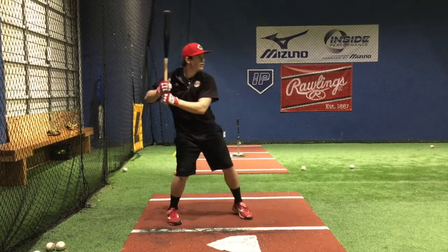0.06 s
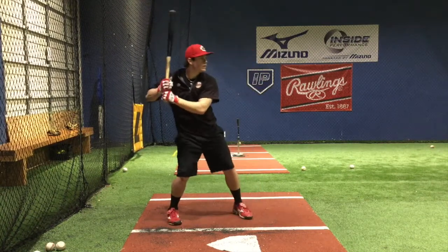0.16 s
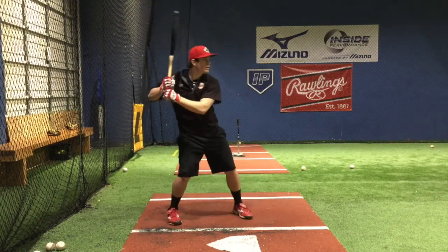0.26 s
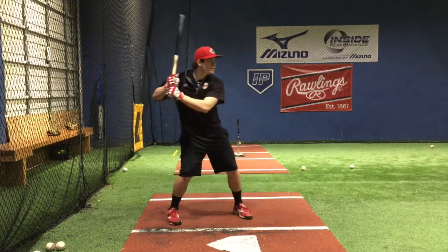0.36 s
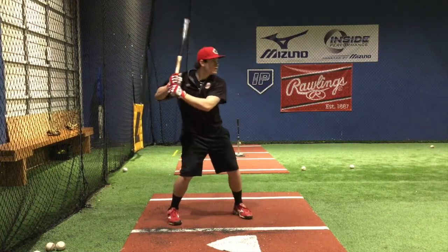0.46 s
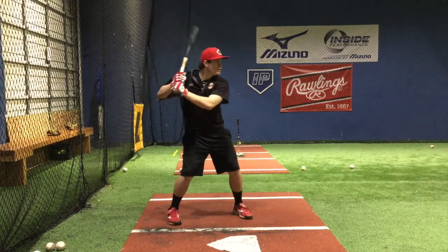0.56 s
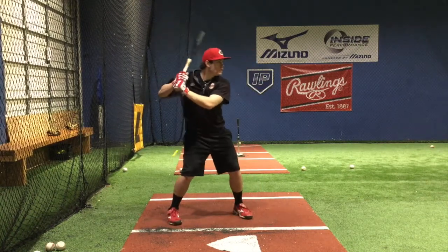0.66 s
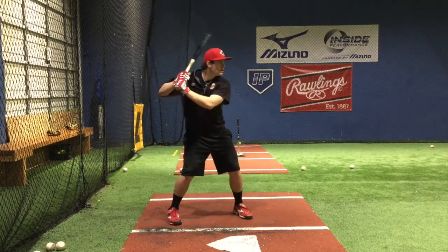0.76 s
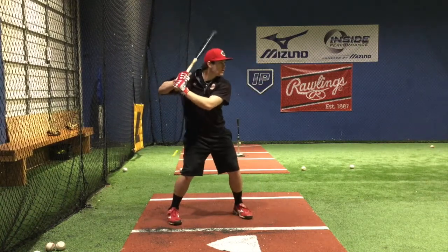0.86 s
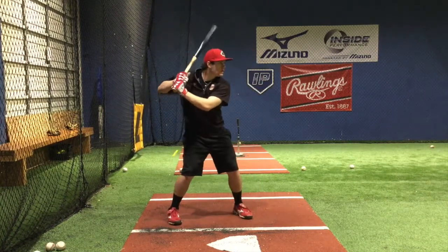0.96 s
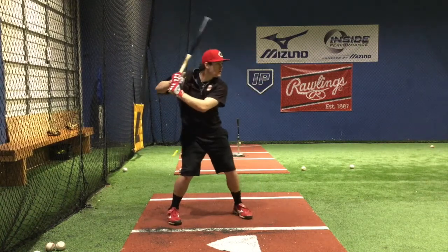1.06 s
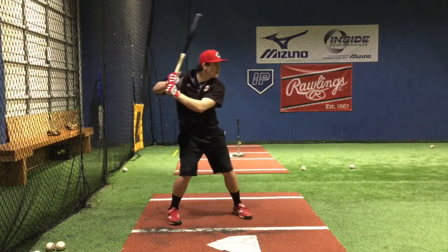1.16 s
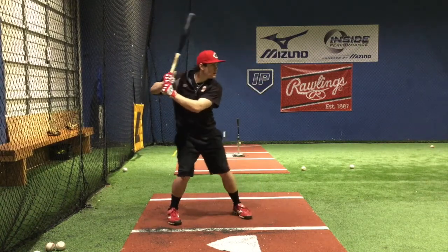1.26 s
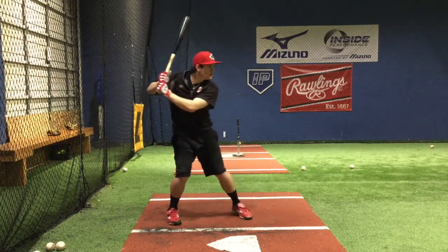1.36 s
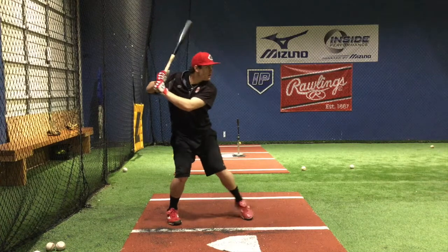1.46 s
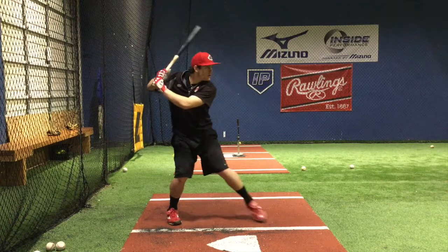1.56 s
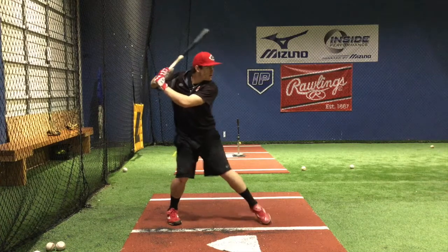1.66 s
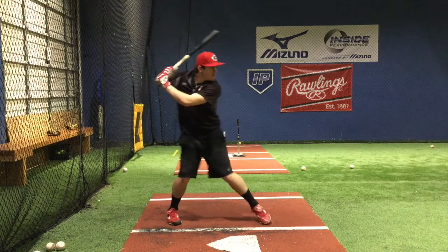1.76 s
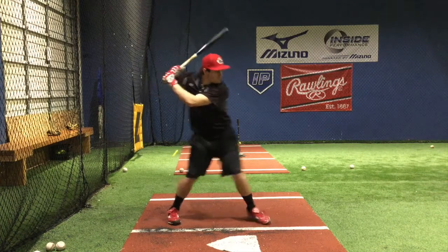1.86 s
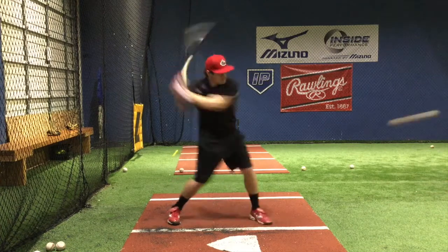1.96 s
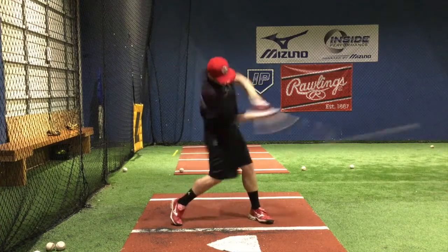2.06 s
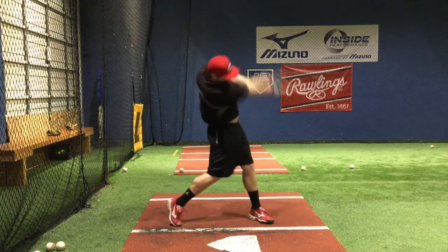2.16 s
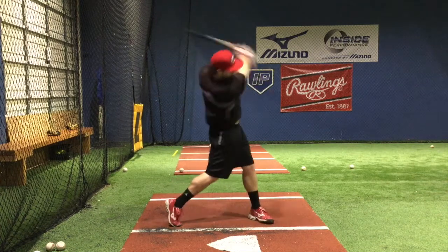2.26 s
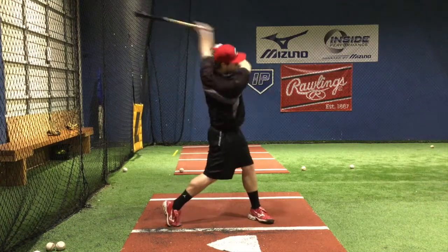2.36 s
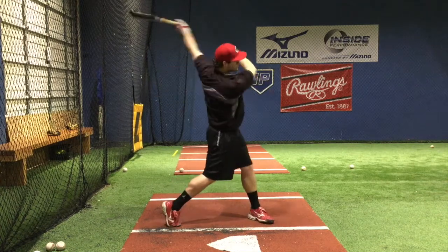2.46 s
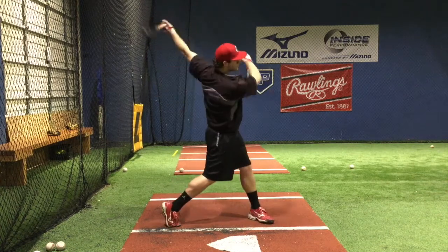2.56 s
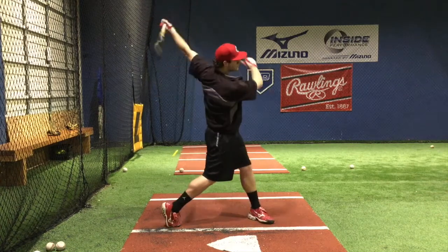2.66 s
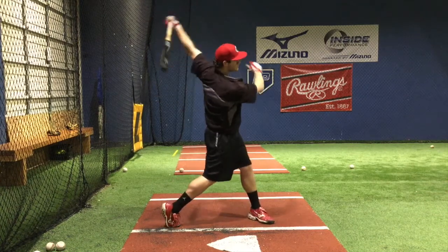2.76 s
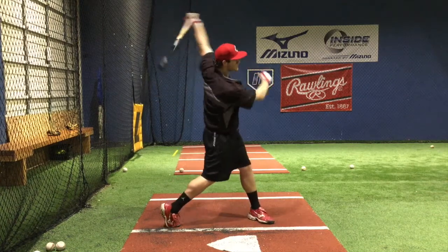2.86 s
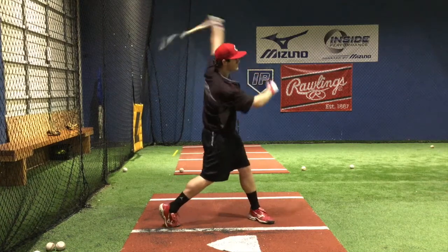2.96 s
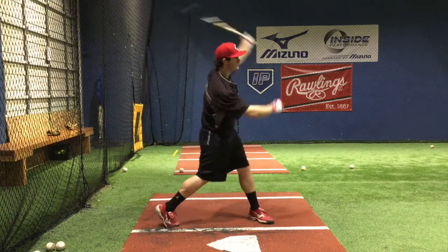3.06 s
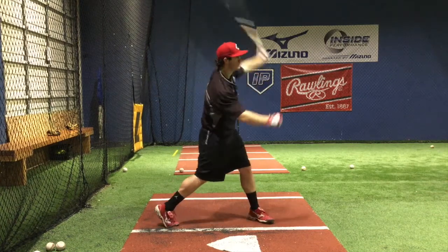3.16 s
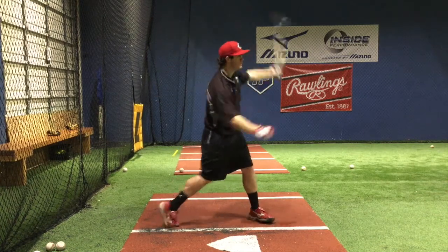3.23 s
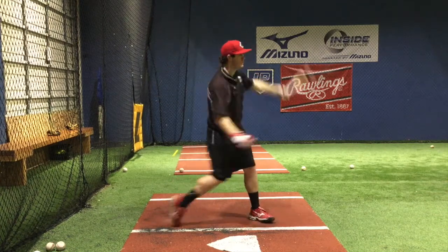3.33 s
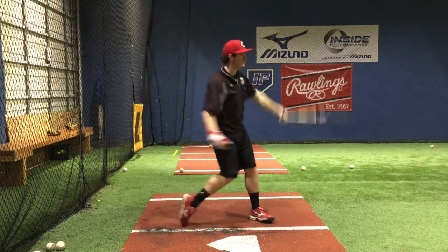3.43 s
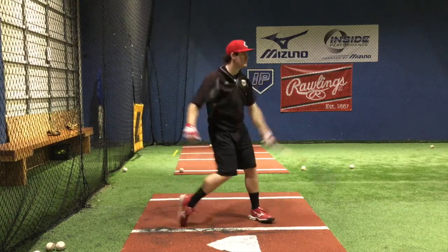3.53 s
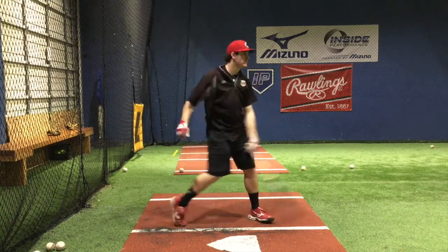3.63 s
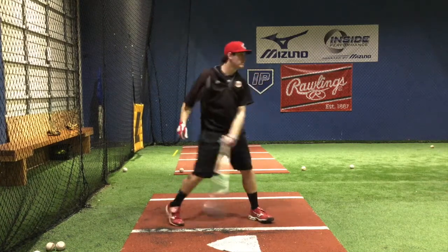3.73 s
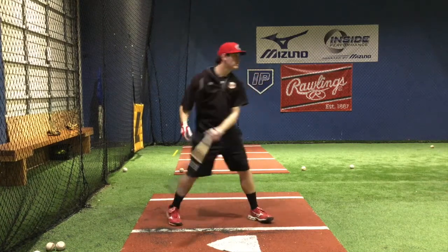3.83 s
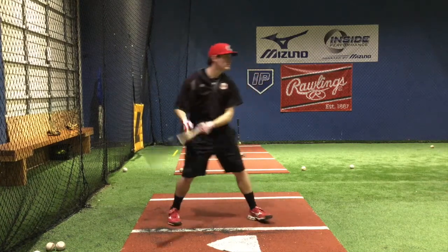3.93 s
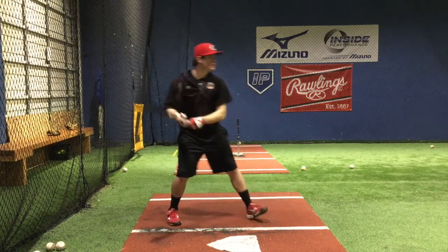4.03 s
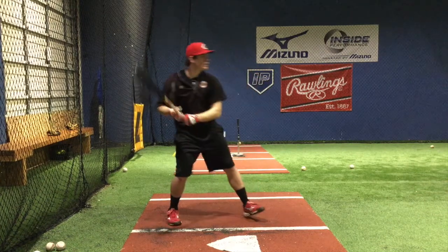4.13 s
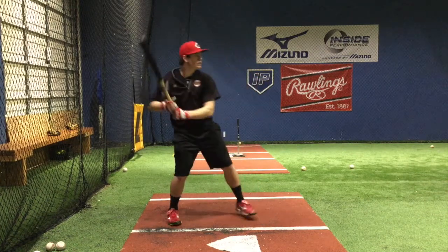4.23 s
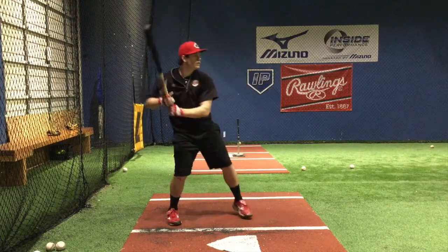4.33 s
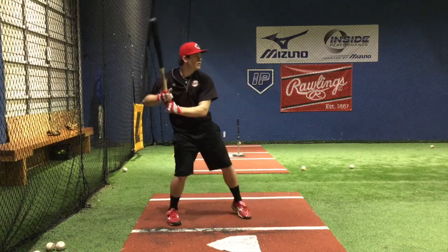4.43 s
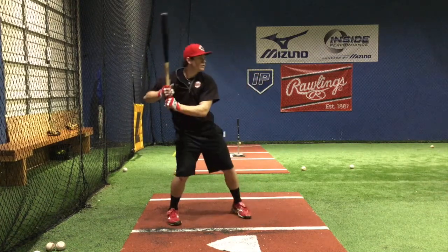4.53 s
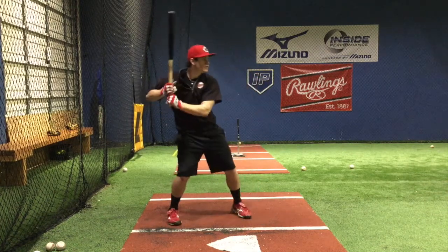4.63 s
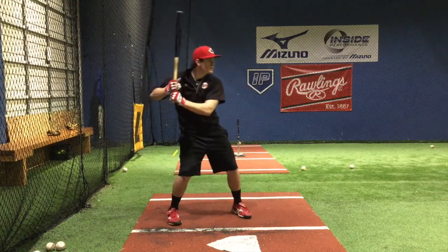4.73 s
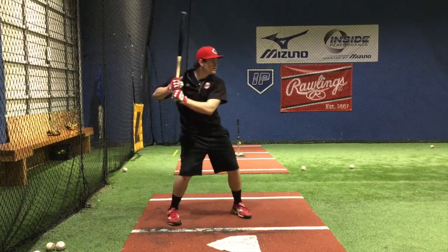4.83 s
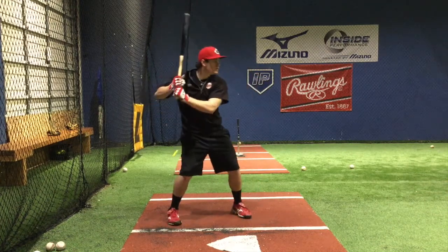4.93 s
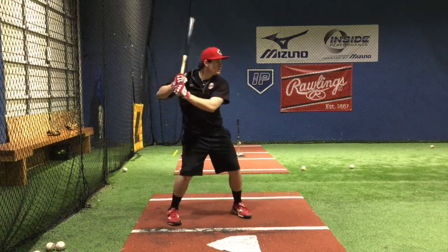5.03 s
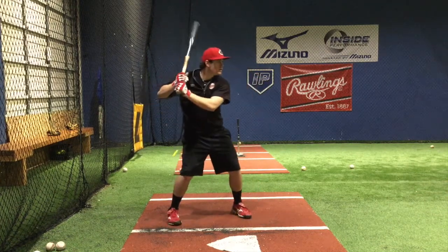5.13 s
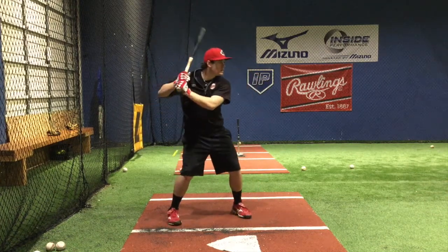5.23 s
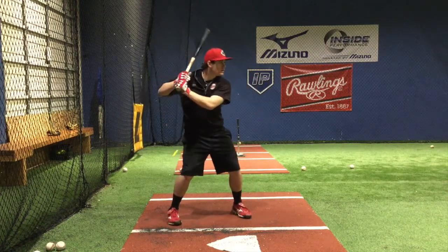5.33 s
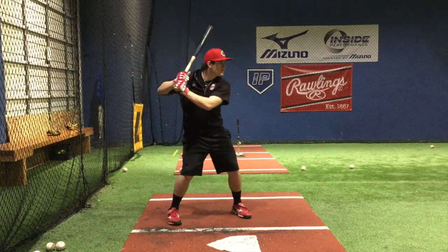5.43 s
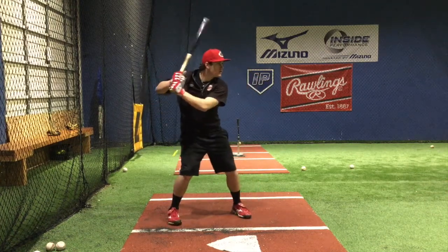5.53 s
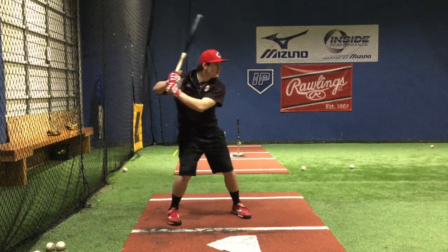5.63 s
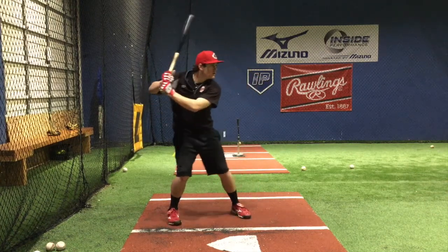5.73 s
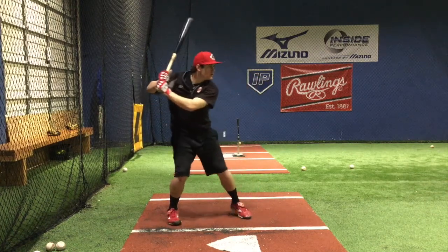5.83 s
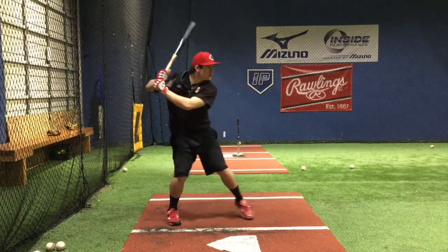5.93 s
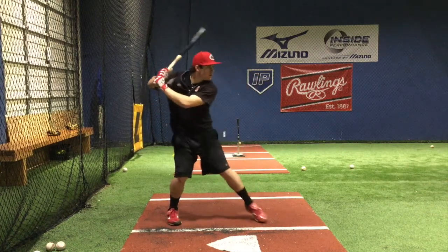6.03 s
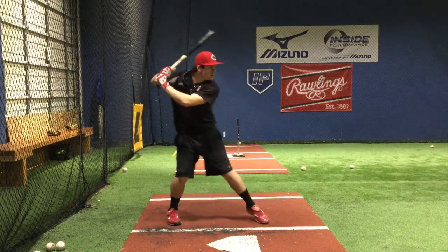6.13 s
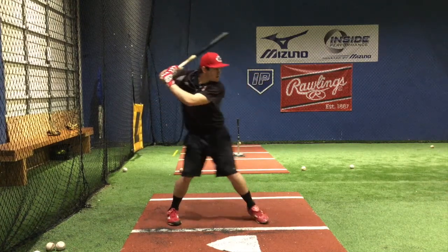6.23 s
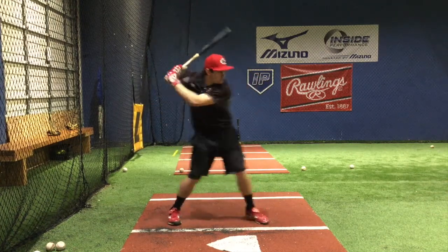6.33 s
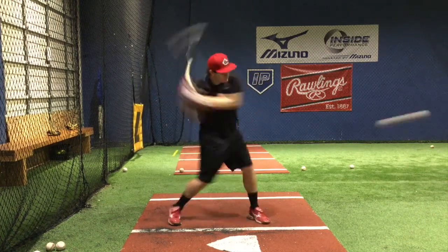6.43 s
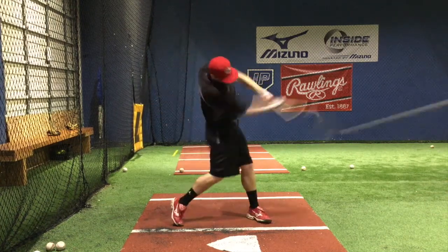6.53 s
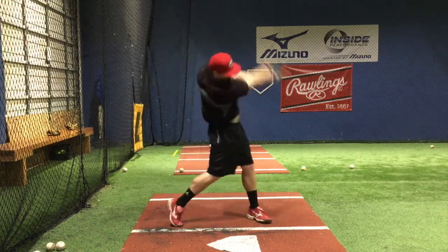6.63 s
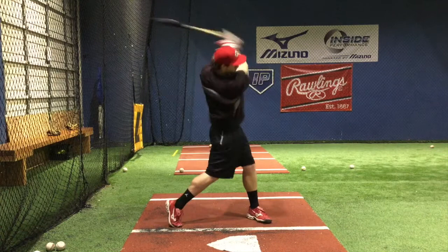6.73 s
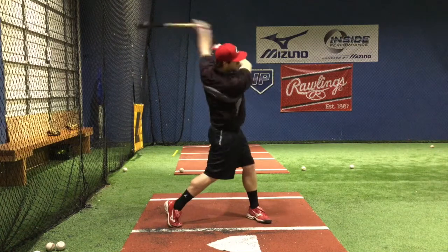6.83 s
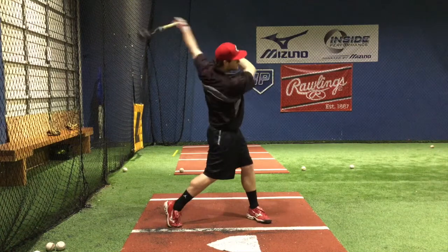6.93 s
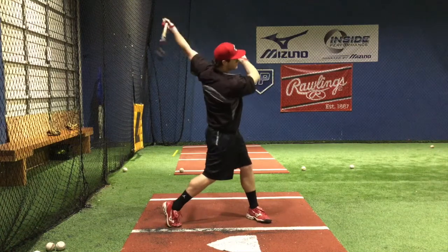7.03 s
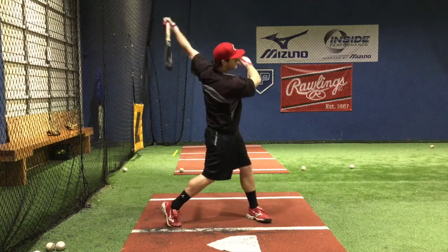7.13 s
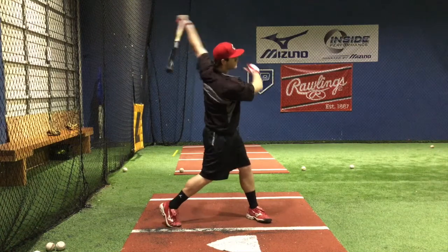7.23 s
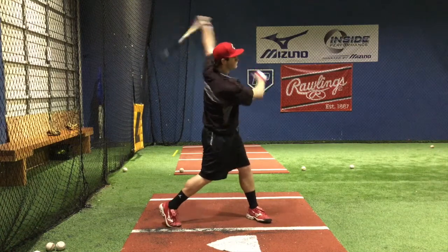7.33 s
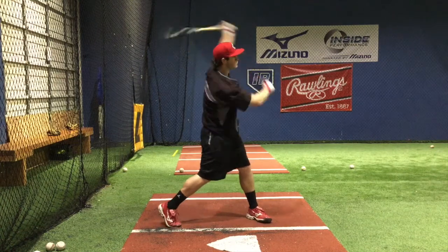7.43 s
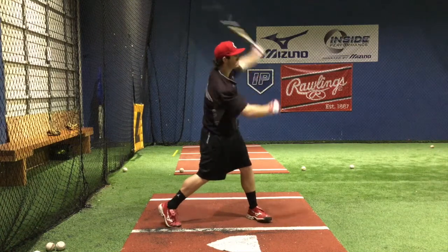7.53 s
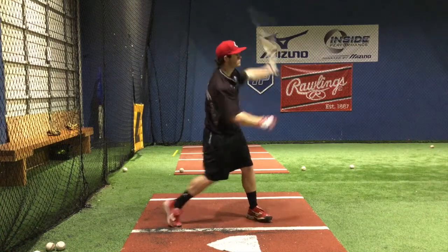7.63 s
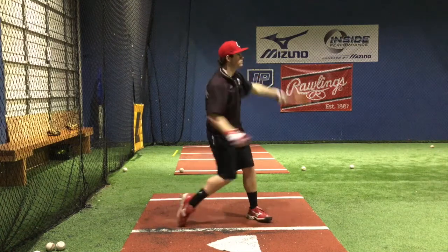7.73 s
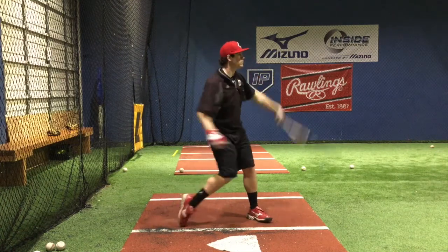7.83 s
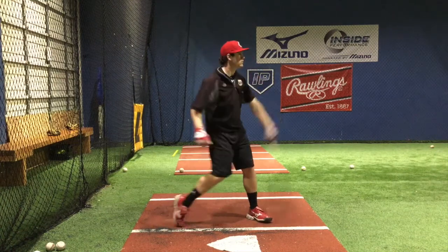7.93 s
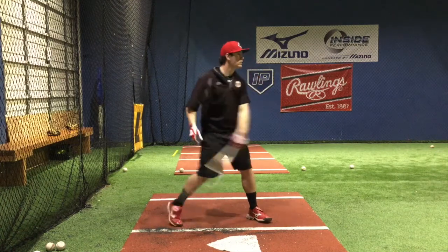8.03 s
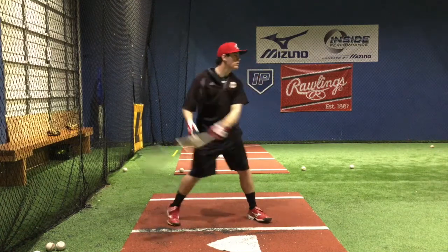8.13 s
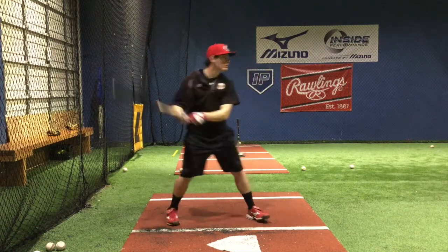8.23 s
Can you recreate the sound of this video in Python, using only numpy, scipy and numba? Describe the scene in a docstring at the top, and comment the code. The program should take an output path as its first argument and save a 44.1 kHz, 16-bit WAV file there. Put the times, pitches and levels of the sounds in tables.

```python
"""A large indoor batting cage, where two bat swings meet a ball a few metres from a small recorder.
Each crack is a burst of decaying barrel modes that overloads the input, slaps back from the far walls
and rings in a hall of decaying noise bands. The ball booms on a padded wall, as knocks that ring its panel,
or rattles the net; shoes scuff the mat. Rattle, scuffs and ticks are band-passed noise.
Mains hum, as slowly wavering sines, and ventilation rumble, as shaped noise, run throughout."""
import sys
import numpy as np
from scipy import signal
from scipy.fft import rfft, irfft
from scipy.io import wavfile
from scipy.ndimage import uniform_filter1d
from numba import njit

SR = 44100
rng = np.random.default_rng(int(sys.argv[2]) if len(sys.argv) > 2 else 0)


def store_pcm(level_fs):
    """Save levels as 16-bit WAV."""
    pcm = np.round(np.clip(level_fs, -1, 1) * 32767).astype(np.int16)
    wavfile.write(sys.argv[1], SR, np.atleast_2d(pcm).T)


def volts_from_decibels(level):
    """Turn decibel levels (scalar or array-like) into linear amplitude factors."""
    exponent = np.asarray(level, float) / 20
    return 10 ** exponent


N = 365148
T = np.arange(N) / SR

# Bat on ball. Each row: time in seconds, crack level in dB, hall level in dB against the crack,
# body level in dB against the barrel's ping, time constant of the thump's slide in seconds.
HITS = [(2.1347, 16.5, -39.5, 1.5, 0.0012), (6.578, 15.5, -36.5, -5, 0.00063)]
# Echoes from floor, side walls and end walls, the far ones dragging a clump of scatter.
# Each row: delay in seconds, relative slap level in dB, clump level in dB against the smooth tail.
ECHOES = [(0.0138, 0.5, -29.5), (.0255, -7, -30.5), (.031, -6.5, -26.5), (.045, 2.5, -5),
          (0.1082, 1.5, -5.5), (.126, -1.5, -16), (0.253, -17, 0.5), (0.263, -6.5, -17), (.383, -22, -4)]


def place(times, sizes):
    """Impulses at the given times in seconds."""
    x = np.zeros(N)
    np.add.at(x, (np.asarray(times) * SR).astype(int), sizes)
    return x


def conv(x, h):
    """Convolution cut to the length of the scene."""
    return signal.fftconvolve(x, h)[:N]


def fade(t, t60):
    """Gain that loses 60 dB in t60 seconds."""
    return np.exp(-np.log(1000) * t / t60)


def ring(modes, seconds):
    """Sum of decaying sines, as a struck body gives."""
    t = T[:int(seconds * SR)]
    return sum(volts_from_decibels(db) * np.sin(2 * np.pi * hz * t) * fade(t, t60) for hz, db, t60 in modes)


def band(x, hz, octaves):
    """Band-pass centred on hz, this many octaves wide."""
    edges = np.clip(hz * 2 ** (np.array([-.5, .5]) * octaves), 20, .45 * SR)
    return signal.sosfilt(signal.butter(2, edges, "band", fs=SR, output="sos"), x)


def unit(x):
    """Scale to rms 1."""
    return x / np.sqrt(np.mean(x ** 2))


def walk(rate):
    """Random levels of rms 1, held 1 / rate seconds and smoothed twice."""
    hold = int(SR / rate)
    steps = np.repeat(rng.standard_normal(N // hold + 1), hold)
    return unit(uniform_filter1d(uniform_filter1d(steps, hold), hold)[:N])


@njit
def follow(x, attack, release):
    """Level follower with separate speeds, per sample, for rising and falling."""
    e, out = 0., np.empty(len(x))
    for i in range(len(x)):
        e += (abs(x[i]) - e) * (attack if abs(x[i]) > e else release)
        out[i] = e
    return out


def ripple(size):
    """Uneven colour: random gains along the spectrum of a sound of this many samples."""
    depth_db, spacing_hz, from_hz = 1.76, 30.96, 450
    knots = np.arange(0, SR / 2 + spacing_hz, spacing_hz)
    bumps = rng.standard_normal(len(knots)) * (knots > from_hz)
    return volts_from_decibels(depth_db * np.interp(np.fft.rfftfreq(size, 1 / SR), knots, bumps))


def building():
    """Wavering mains hum and fan tones over ventilation noise whose bands swell slowly on their own."""
    # Mains hum and fan tones. Each row: frequency in Hz, rms level in dB about which it wavers.
    tones = [(120, -45.5), (240, -54), (280, -68.5), (350, -65.5), (420, -76.5)]
    # Colour of the ventilation rumble. Each row: frequency in Hz, relative density in dB per Hz.
    rumble = [(20, -44.5), (35, -18), (58, 4.5), (80, 1), (105, -5), (170, -9), (300, -17), (380, -22),
              (520, -33), (1400, -35), (2500, -43.5), (7300, -60.5), (12900, -64), (16000, -67)]
    waver_db, swell_db, changes_per_s, air_db = .7, 0.27, 5.9, -46
    hum = 0
    for hz, db in tones:
        sine = np.sqrt(2) * np.sin(2 * np.pi * (hz * T + rng.random()))
        hum = hum + volts_from_decibels(db + waver_db * walk(changes_per_s)) * sine
    hz, db = np.transpose(rumble)
    bins = np.fft.rfftfreq(N, 1 / SR) + 1  # 1 Hz up, to keep the logarithm finite
    colour = volts_from_decibels(np.interp(np.log(bins), np.log(hz), db)) * ripple(N)
    air = 0
    for low, high in [(0, 100), (100, 450), (450, 3000), (3000, SR)]:
        noise = rfft(rng.standard_normal(N))
        part = irfft(noise * colour * (bins >= low) * (bins < high), N)
        air = air + part * volts_from_decibels(swell_db * walk(changes_per_s))
    return hum + volts_from_decibels(air_db) * unit(air)


def rustle():
    """Grainy noise that swells and fades with each movement: bat through air, net rattle, shoe scuffs."""
    # Net rattle and shoe scuffs. Each row: time of the peak in seconds, level at the peak in dB,
    # centre in Hz, width in octaves, length in seconds.
    movements = [(2.46, -69, 10000, 1.2, .09), (2.819, -69, 9000, 1.8, 0.24), (3.4, -82, 12000, 0.37, .1),
                 (3.473, -62.5, 1490, 1.7, 0.13), (3.478, -73.5, 11000, 1.2, 0.17),
                 (3.737, -83, 12000, 0.54, .06), (3.78, -65, 1340, 1.04, 0.52),
                 (3.753, -48, 208, 0.54, 0.17), (7.231, -41.5, 2400, 0.71, 0.058),
                 (7.25, -65.5, 10000, 1, 0.25), (7.838, -77, 3200, 3.3, 0.066),
                 (8.251, -80, 10340, 1.4, 0.051)]
    # the bat cuts the air before each hit; same columns
    swings = [(s - 0.15, -72, 2765, 4.2, .28) for s, *_ in HITS]
    rise_share, bend = .28, 1.5  # part of each movement spent swelling, exponent of the swell
    grains = rng.standard_normal(N) * volts_from_decibels(2.0 * walk(300))
    out = 0
    for s, db, hz, width, length in swings + list(movements):
        corners = s + length * np.array([-rise_share, 0, 1 - rise_share])
        swell = np.interp(T, corners, [0, 1, 0]) ** bend
        out = out + volts_from_decibels(db) * unit(band(grains, hz, width)) * swell
    return out


def bat():
    """Barrel modes crack, a sliding low sine thumps, walls slap back; also returns what feeds the hall."""
    # Bat barrel and ball. Each row: frequency in Hz, relative level in dB, 60 dB decay in seconds.
    modes = [(520, -1.5, .012), (680, 5.5, 0.018), (1086, 6, 0.011), (1320, -0.5, 0.015), (1980, 1, 0.017),
             (2500, 8.5, 0.008), (2896, 6.5, 0.01), (4857, 10, 0.0024), (7000, -6.5, 0.0023),
             (9800, 0.5, 0.0031), (12075, -1.5, 0.004)]
    s, crack_db, hall_db, body_db, slide_s = np.transpose(HITS)
    t = T[:SR // 5]
    crack = ring(modes, .05)
    crack = crack / np.abs(crack).max()
    blows = place(s, volts_from_decibels(crack_db))

    # soft walls and air keep mostly the upper middle of the crack
    delay, slap_db, _ = np.transpose(ECHOES)
    echoes = conv(band(crack, 2100, octaves=0.77), place(delay, volts_from_decibels(slap_db))[:SR])
    # the bright edge of the echoes is eaten by the air on the way
    treble_db, air_loss_db_per_s = -7, 52
    edge_db = slap_db + treble_db - air_loss_db_per_s * delay
    echoes = echoes + conv(band(crack, 5500, octaves=4.2), place(delay, volts_from_decibels(edge_db))[:SR])
    out = conv(blows, crack) + volts_from_decibels(-16) * conv(blows, echoes)

    # the thump's pitch slides down to end_hz, adding extra_cycles on the way
    end_hz, extra_cycles, thump_t60_s, lag_s = 72.4, 0.66, .06, .0012
    cycles = end_hz * t + extra_cycles * (1 - np.exp(-t / slide_s[:, None]))
    thumps = -np.sin(2 * np.pi * cycles) * fade(t, thump_t60_s)
    thump_db = crack_db - 11.5 + .4 * body_db  # takes on a share of the body level
    for at, db, thump in zip(s, thump_db, thumps):
        out = out + conv(place([at + lag_s], volts_from_decibels(db)), thump)

    # a thin hiss swells in just ahead of each crack: a fade run backwards
    hiss = unit(band(rng.standard_normal(N), 3000, octaves=1.2))
    out = out + volts_from_decibels(-42.5) * hiss * conv(blows[::-1], fade(t, 0.043))[::-1]

    # body level raises or lowers the low part of what each hit sends into the hall
    lows = signal.butter(1, 1400, fs=SR, output="sos")
    sent = volts_from_decibels(crack_db + hall_db)
    body = signal.sosfilt(lows, place(s, sent * (volts_from_decibels(body_db) - 1)))
    return out, place(s, sent) + body


def hall():
    """Diffuse answer of the hall: half-octave noise bands, each dying at its own rate, grainy while young."""
    # Hall tail. Each row: frequency in Hz, relative level in dB, 60 dB decay in seconds.
    tail = [(243, -3.5, 1.2), (506, -5, 1.1), (885, 0.5, 1.38), (1740, 0, 1.4), (2400, 3, 1.212),
            (3200, -4.5, 1.186), (4830, -5, 0.94), (5800, -10, 0.8), (8150, -14, 0.61),
            (13156, -10.5, 0.28)]
    build_s, clump_t60_s = 0.0046, 0.21
    # how far reflections stand out, in all bands at once and band by band, until they merge
    grain_db, flare_db, merge_t60_s = 3, 1.5, 3.7
    t = T[:2 * SR]
    hz, db, t60 = np.transpose(tail)
    delay, _, clump_db = np.transpose(ECHOES)
    clumps = 1 + conv(place(delay, volts_from_decibels(clump_db)), fade(t, clump_t60_s))[:len(t)]
    grain = volts_from_decibels(grain_db * walk(1500)[:len(t)] * fade(t, merge_t60_s))
    build = 1 - np.exp(-t / build_s)
    noise = ripple(len(t)) * rfft(rng.standard_normal(len(t)) * grain * clumps * build)
    # half-octave steps above 200 Hz
    step = 2 * np.log2((np.fft.rfftfreq(len(t), 1 / SR) + 1) / 200)
    out = 0
    for k in range(14):
        log_hz = np.log(200 * 2 ** (k / 2))
        band_db = np.interp(log_hz, np.log(hz), db)
        band_t60 = np.interp(log_hz, np.log(hz), t60)
        # overlapping triangles that sum to one leave no hollows between bands
        part = irfft(noise * np.clip(1 - np.abs(step - k), 0, 1), len(t))
        # each reflection has its own colour, so the bands flare apart
        flare = flare_db * walk(120)[:len(t)] * fade(t, merge_t60_s)
        out = out + volts_from_decibels(band_db + flare) * part * fade(t, band_t60)
    return out / np.sqrt(np.mean(out[:SR // 5] ** 2))


def wall():
    """A push and a lingering shudder of the padding ring the panel; the ball's skin adds a short slap."""
    # Ball against the padded wall, then the panel knocking back. Each row: time in seconds, boom in dB.
    knock_rows = [(2.3822, -9), (2.4, -9.5), (2.469, -26), (2.611, -20), (2.719, -32.5), (2.77, -41)]
    # Wall panel. Each row: frequency in Hz, relative level in dB, 60 dB decay in seconds.
    panel_modes = [(74.6, -24, 0.33), (98.3, -7, 0.27), (130.3, 10.5, 0.09), (173, 5.5, 0.094),
                   (200.8, -7, 0.34), (243.6, 3, 0.066), (299.5, -5.5, 0.11)]
    s, boom_db = np.transpose(knock_rows)
    t, short = T[:SR], T[:SR // 10]
    knocks = place(s, volts_from_decibels(boom_db))
    push = conv(knocks, np.hanning(60) / 30)
    shudder = volts_from_decibels(-32.5) * conv(knocks, fade(t, 0.59)) * rng.standard_normal(N)
    panel = band(ring(panel_modes, .5), 152, octaves=2.1)
    boom = conv(push + shudder, panel / np.abs(panel).max())
    # each dB of boom lost costs the slap slope dB
    first_slap_db, slope, to_hall_db = -22.5, 3.9, -17.5
    slaps = place(s, volts_from_decibels(first_slap_db + slope * (boom_db - boom_db[0])))
    slap = unit(band(rng.standard_normal(len(short)), 910, octaves=2.8)) * fade(short, 0.12)
    # bright edge of each slap
    snap = unit(band(rng.standard_normal(len(short)), 9000, octaves=1.2)) * fade(short, 0.02)
    return boom + conv(slaps, slap + volts_from_decibels(-9) * snap), volts_from_decibels(to_hall_db) * slaps


def ticks():
    """Dry clicks of decaying noise, each with its own colour, which it also hands to the hall."""
    # Ball, shoe and net hardware ticking. Each row: time in seconds, starting level in dB,
    # centre in Hz, width in octaves.
    clicks = [(2.7918, -42.5, 8470, 4.1), (2.803, -42, 6440, 0.7), (2.89, -51, 5370, 0.72),
              (2.898, -62, 6160, 0.55), (2.932, -55, 5000, 1), (6.522, -48, 3200, 0.79),
              (7.208, -47, 6000, 0.84), (7.2157, -34, 2400, 1.2), (7.227, -38.5, 4030, 2.5),
              (7.244, -53.5, 2300, 0.6)]
    t60_s, to_hall_db = 0.014, -18.5
    out, feed, t = 0, 0, T[:SR // 20]
    for s, db, hz, width in clicks:
        click = unit(band(rng.standard_normal(len(t)), hz, width)) * fade(t, t60_s)
        out = out + conv(place([s], volts_from_decibels(db)), click)
        feed = feed + band(place([s], volts_from_decibels(db + to_hall_db)), hz, width)
    return out, feed


def scene():
    """All sources at the microphone, with the struck ones feeding the hall."""
    direct, feed = np.sum([bat(), wall(), ticks()], axis=0)
    return (direct + conv(feed, hall()) + rustle() + building())[None]


def top_cut(x):
    """Nothing passes above the cut-off."""
    return signal.sosfilt(signal.butter(12, 16500, fs=SR, output="sos"), x)


def record(dry):
    """The recorder drops the deepest bass, ducks loud sounds by gain control, saturates and trims the top."""
    x = signal.sosfilt(signal.butter(2, 28, "high", fs=SR, output="sos"), dry[0])
    attack_s, release_s, threshold, ceiling = 0.058, .1, volts_from_decibels(-36), .5
    level = follow(x, 1 / (attack_s * SR), 1 / (release_s * SR))
    x = x * np.maximum(level / threshold, 1) ** -.4
    x = ceiling * np.tanh(x / ceiling)
    # 40 dB down from 15582 Hz upward
    x = signal.sosfilt(signal.cheby2(8, 40, 15582, fs=SR, output="sos"), x)
    return top_cut(x[None])


dry = scene()
out = record(dry)
store_pcm(out)
```